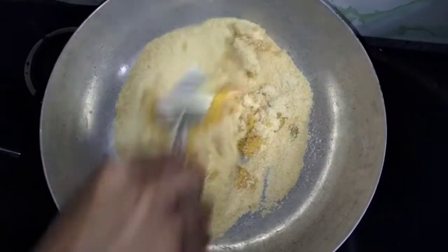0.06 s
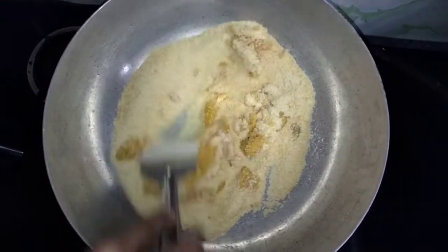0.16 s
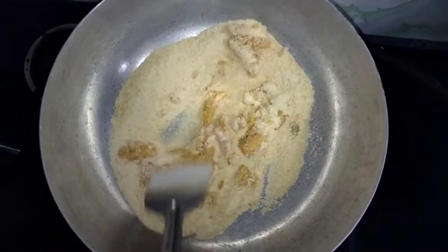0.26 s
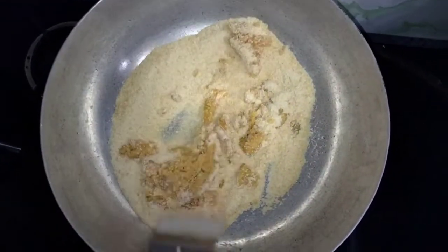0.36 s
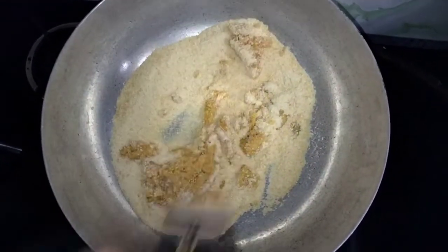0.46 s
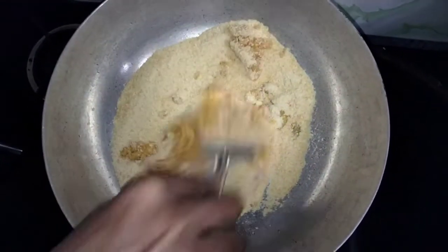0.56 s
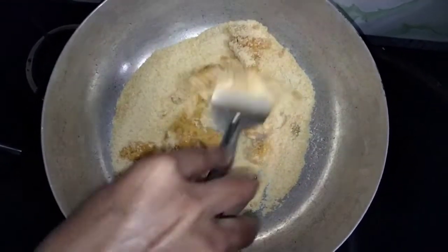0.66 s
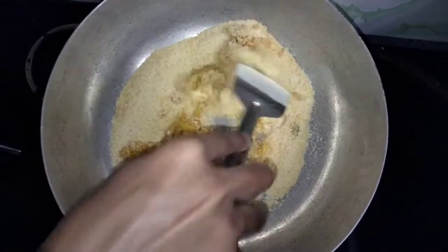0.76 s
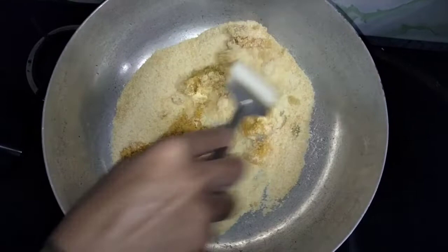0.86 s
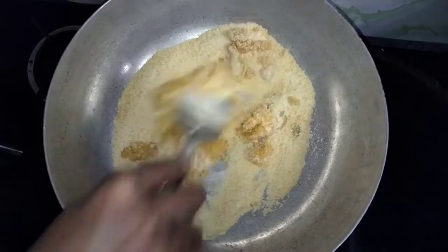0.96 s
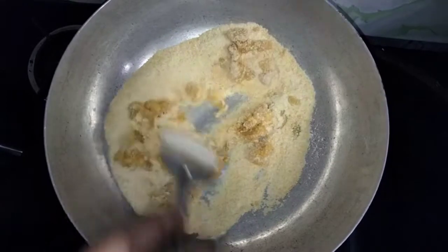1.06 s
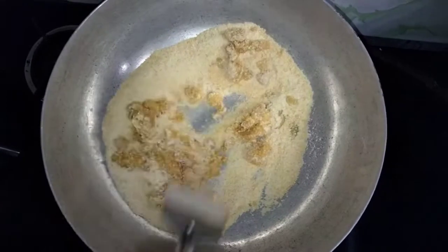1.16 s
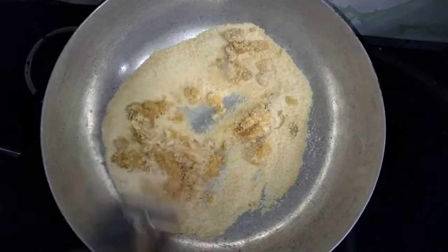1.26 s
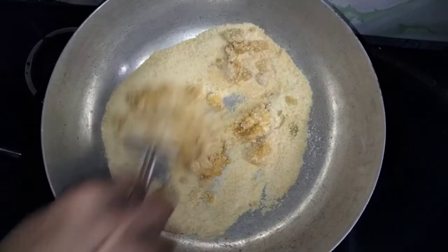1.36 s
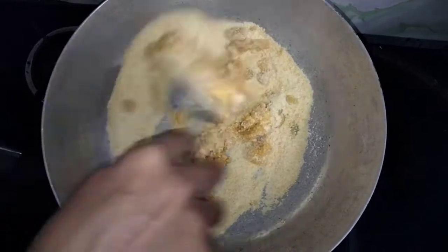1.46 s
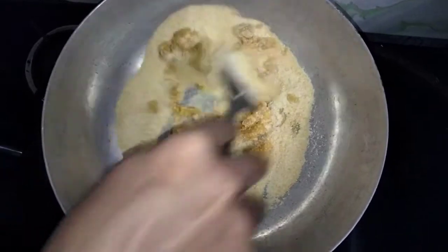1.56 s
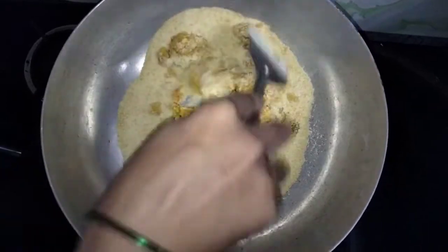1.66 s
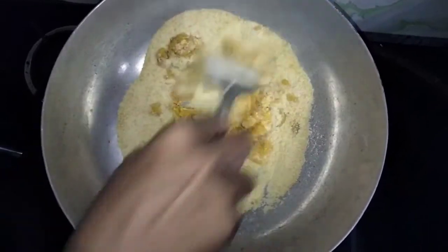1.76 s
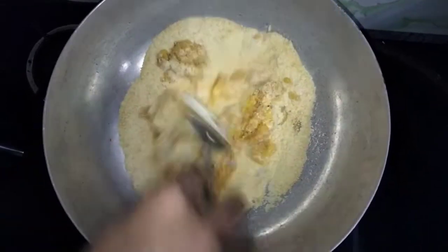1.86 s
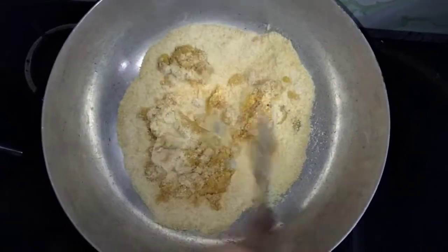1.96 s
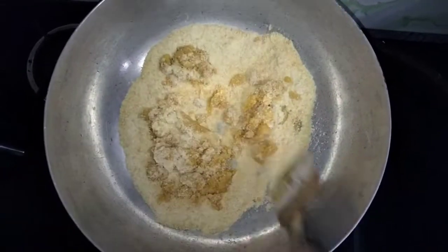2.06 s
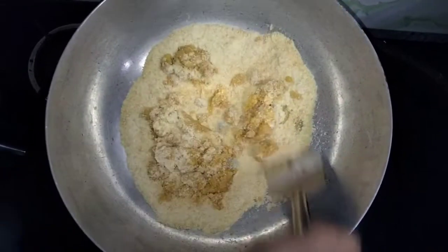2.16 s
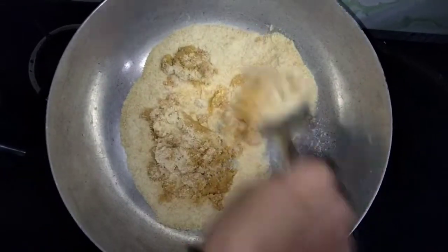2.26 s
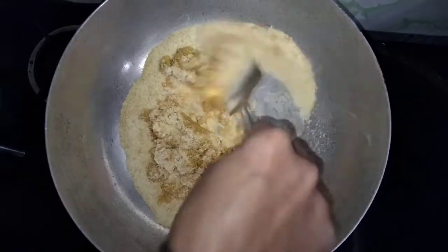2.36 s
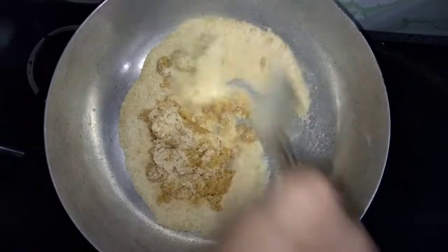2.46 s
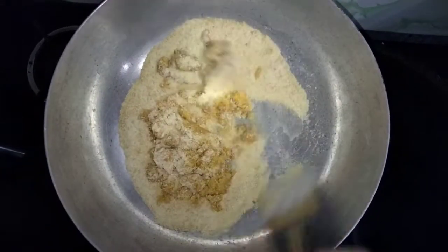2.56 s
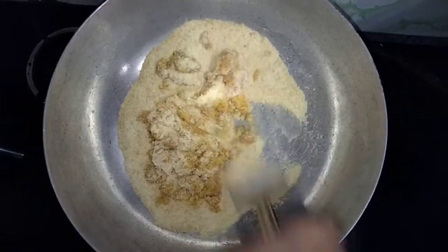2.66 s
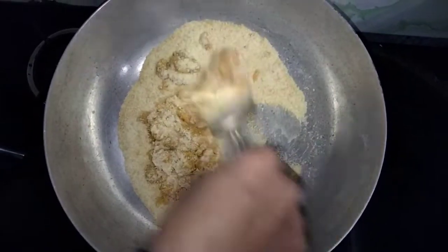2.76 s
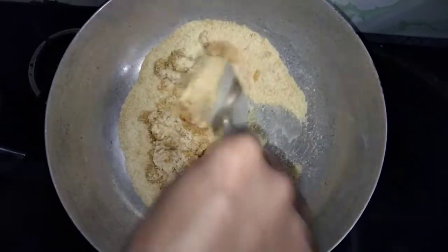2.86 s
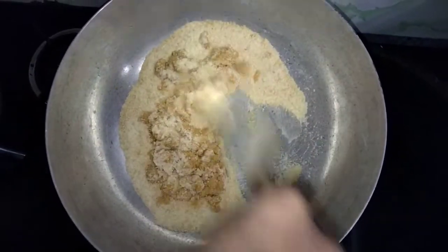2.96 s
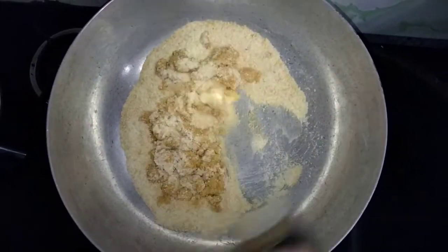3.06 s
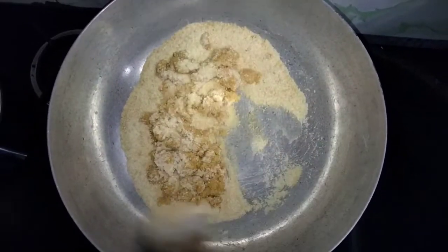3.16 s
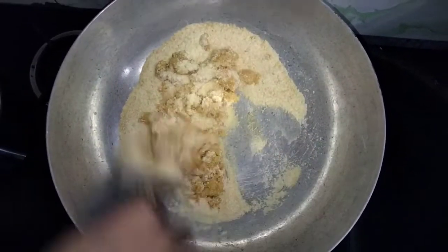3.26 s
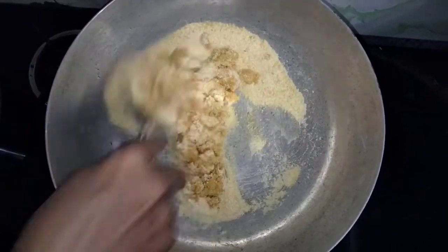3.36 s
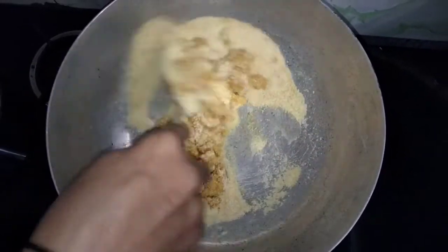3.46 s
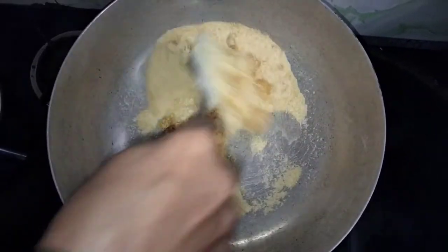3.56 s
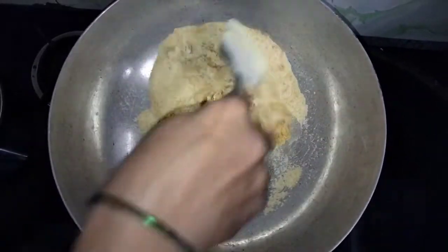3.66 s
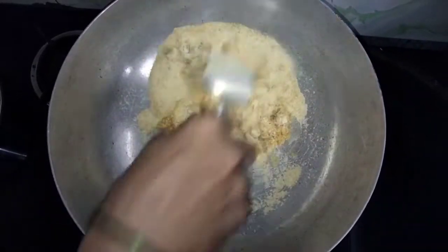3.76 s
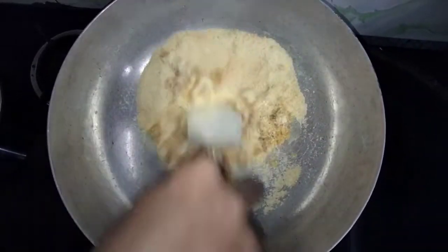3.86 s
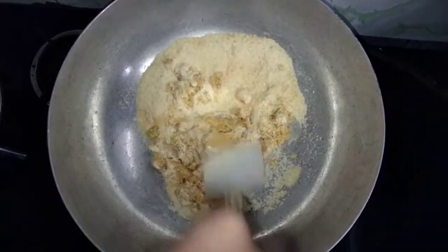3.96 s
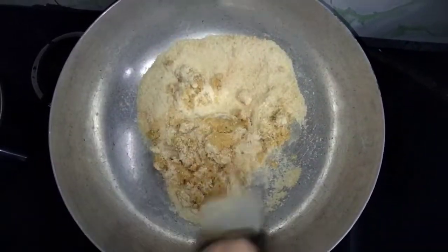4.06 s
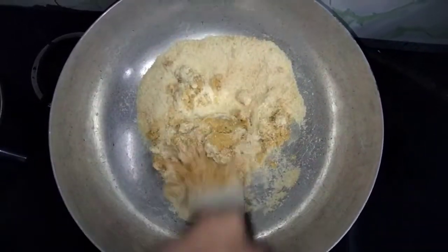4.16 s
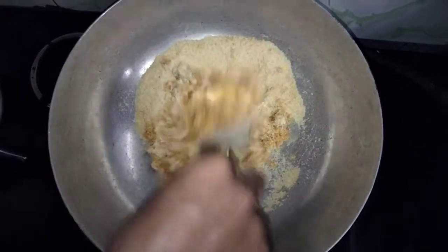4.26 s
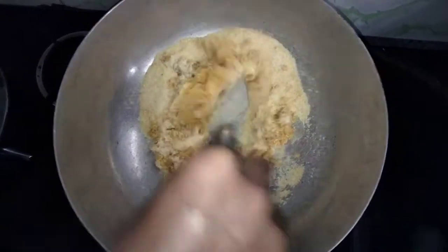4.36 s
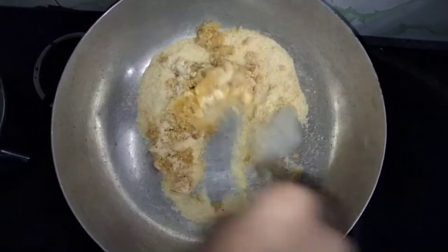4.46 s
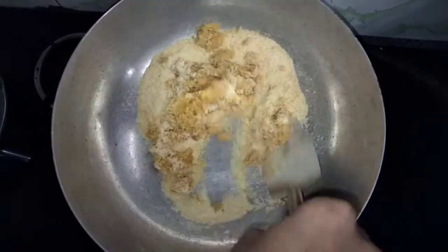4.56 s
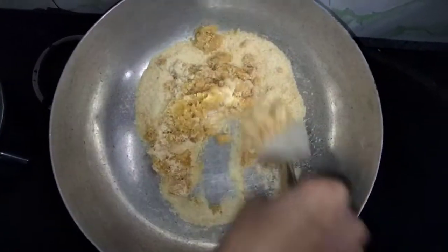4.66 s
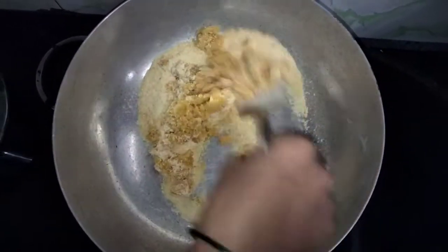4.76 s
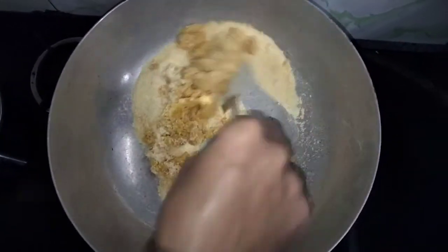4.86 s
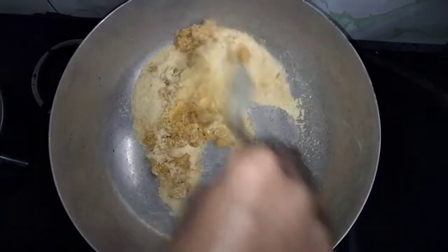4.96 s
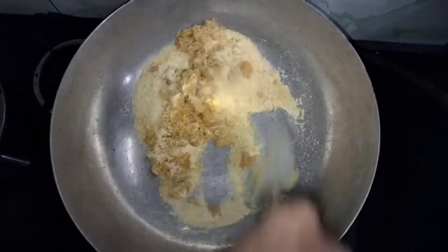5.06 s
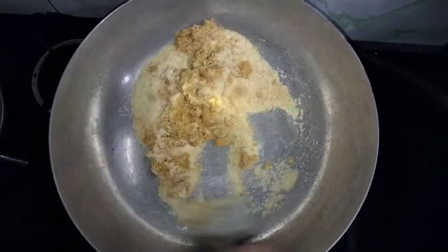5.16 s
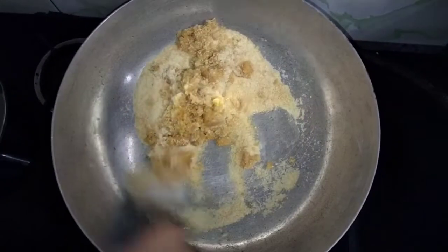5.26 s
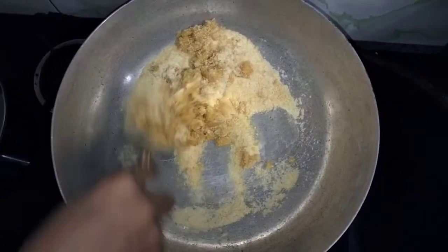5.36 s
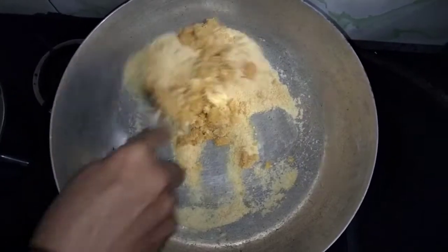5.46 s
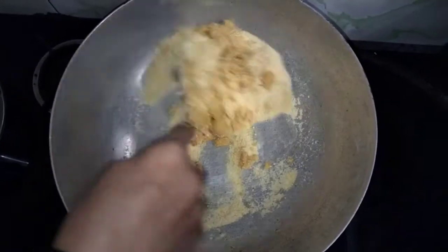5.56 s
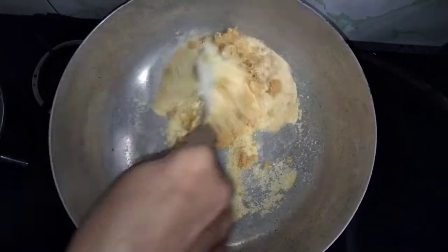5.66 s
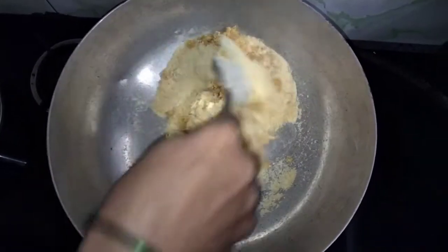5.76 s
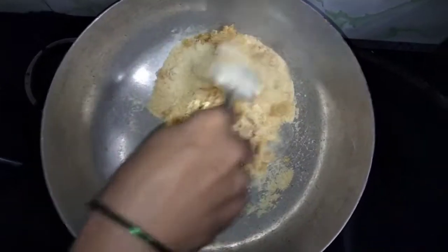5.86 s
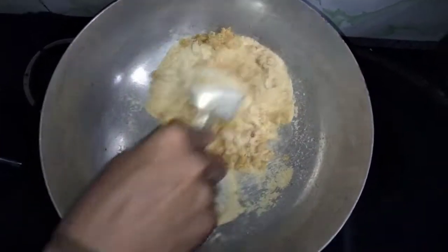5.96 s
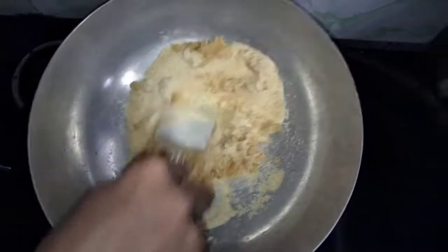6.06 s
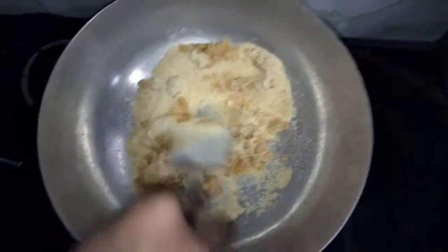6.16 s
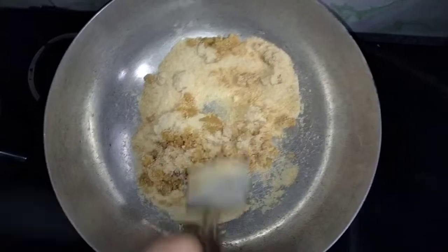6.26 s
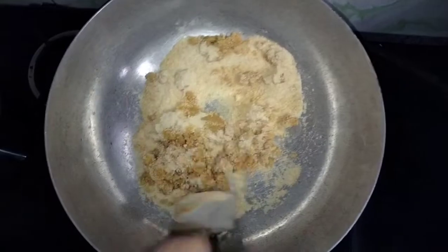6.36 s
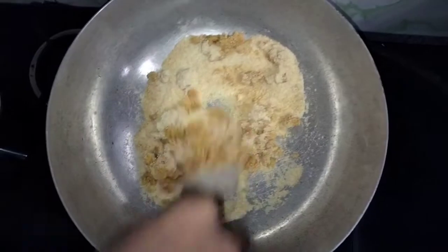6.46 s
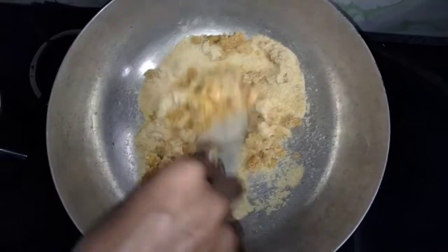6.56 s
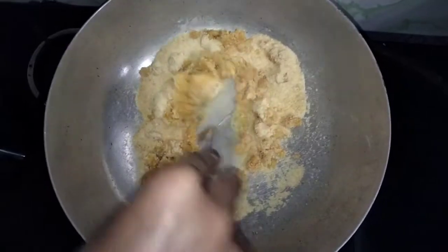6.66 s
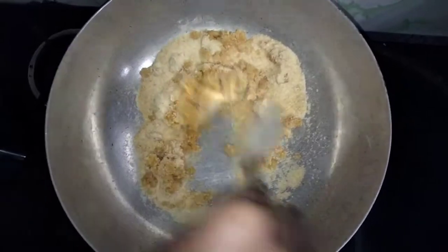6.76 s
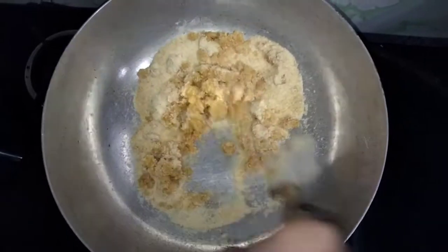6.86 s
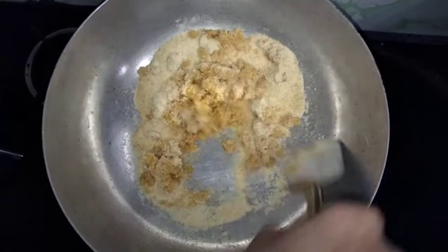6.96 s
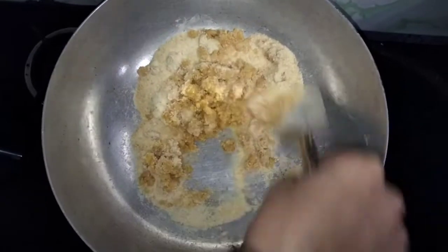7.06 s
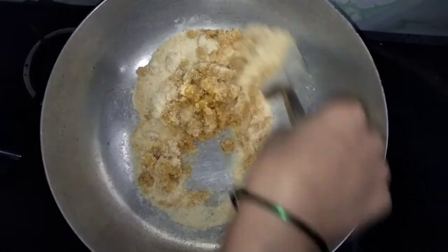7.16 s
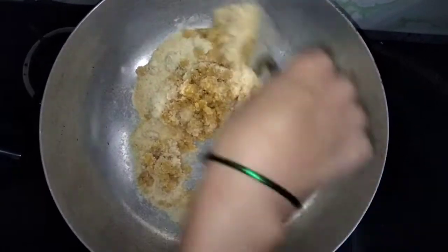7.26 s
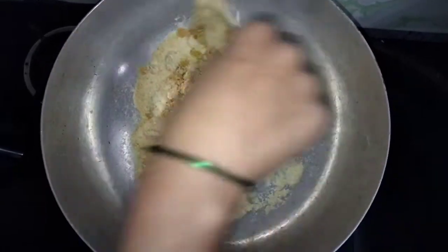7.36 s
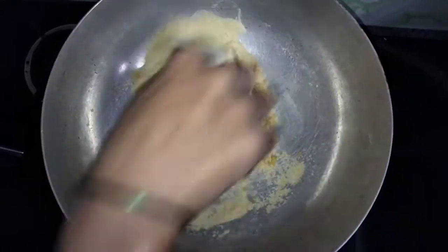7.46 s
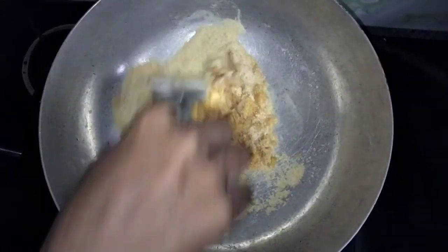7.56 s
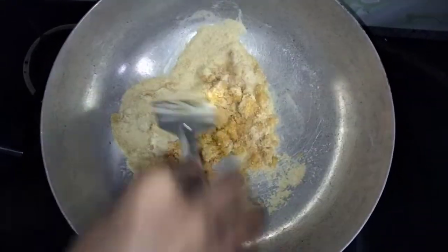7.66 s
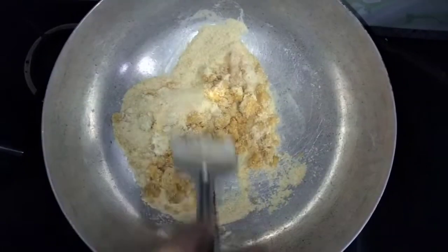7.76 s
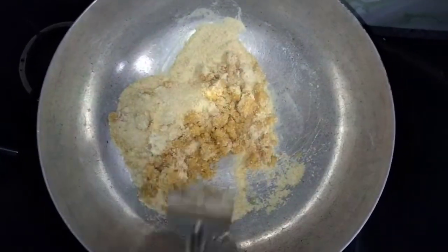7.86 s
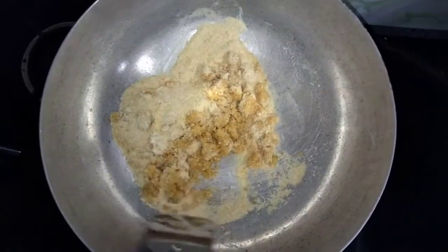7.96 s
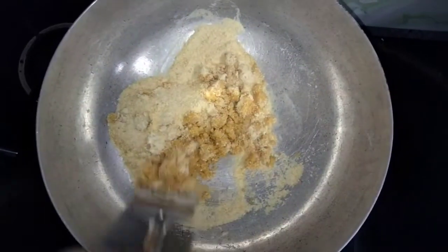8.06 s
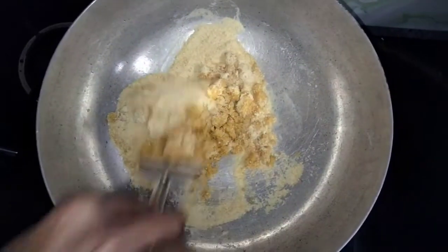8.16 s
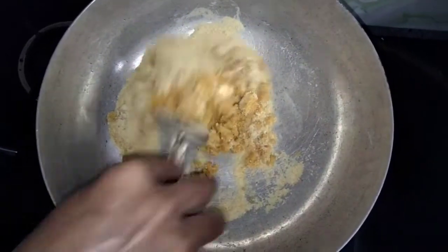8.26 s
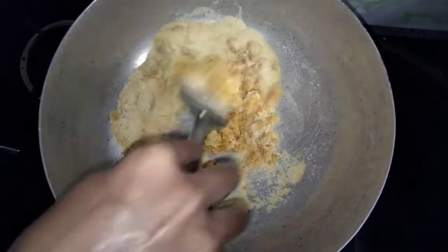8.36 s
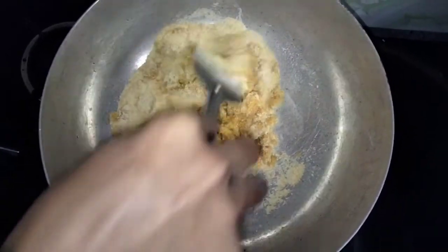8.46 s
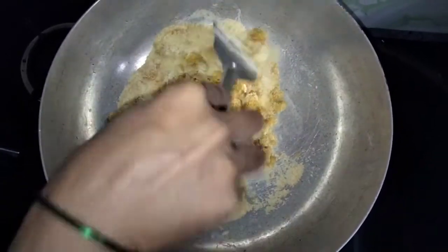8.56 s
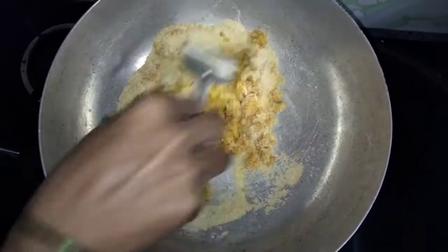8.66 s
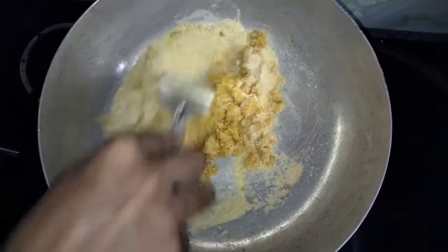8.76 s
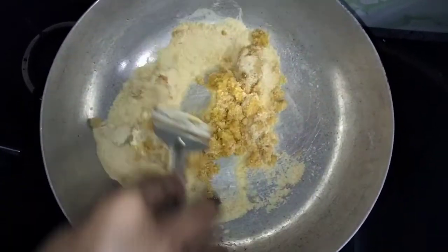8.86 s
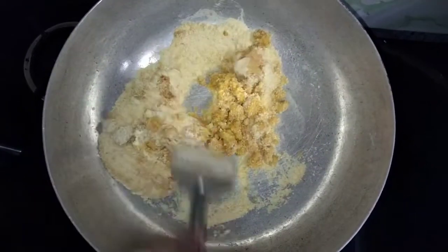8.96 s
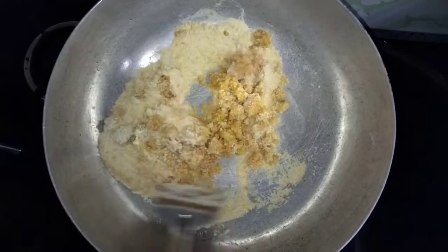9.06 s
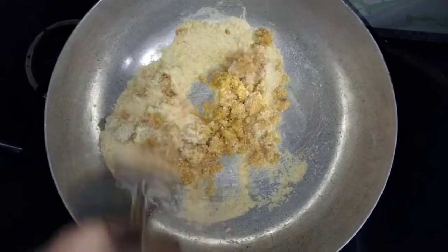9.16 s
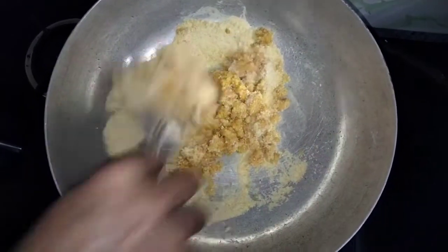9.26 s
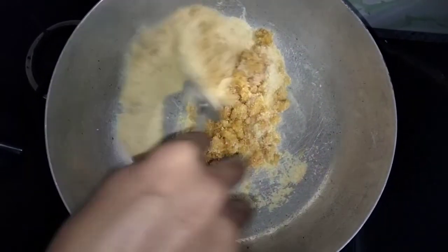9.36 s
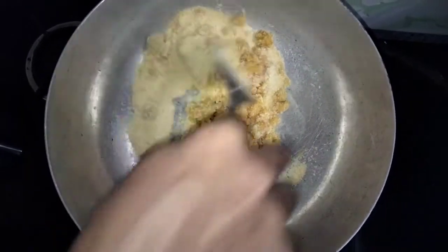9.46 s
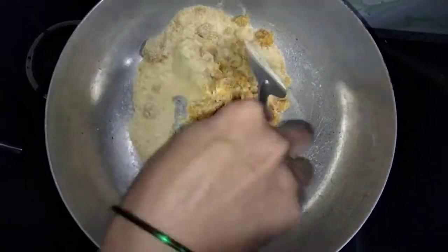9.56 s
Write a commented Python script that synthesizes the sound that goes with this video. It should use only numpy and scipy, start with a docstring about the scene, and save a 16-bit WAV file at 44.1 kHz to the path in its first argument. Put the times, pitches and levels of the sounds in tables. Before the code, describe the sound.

Close, uneven metal scraping in a pan of dry grains: bright rasping strokes, sharp clinks, soft hollow knocks and little spills of grain in a quiet kitchen.

```python
"""First a trickle of grains, then a steel spatula lands and stirs dry, sandy grains in a thin metal pan.
The place is a kitchen, heard close to a small microphone, over low rumble, a wavering hum and a late boom.
Random grit clicks make the sliding grains, the scrape of pan and blade and a moving hollow note.
Noise bursts into the same metal make the taps; soft blows and rattles ring the pan's low modes.
Each stroke lands, builds, sags, lifts off and dies away, with small spills of grains in between."""
import sys
import numpy as np
from scipy import signal
from scipy.fft import rfft, irfft, next_fast_len
from scipy.io import wavfile
from scipy.ndimage import uniform_filter1d, map_coordinates

SR = 44100
rng = np.random.default_rng(int(sys.argv[2]) if len(sys.argv) > 2 else 0)


def put_to_file(sound):
    """Save the sound as 16-bit audio at rate SR, in the file named by the first command-line argument."""
    columns = np.atleast_2d(sound).T  # one column per channel
    safe = np.clip(columns, -1, 1)
    whole_steps = np.round(safe * 32767)
    wavfile.write(sys.argv[1], SR, whole_steps.astype(np.int16))


N = 423801

# Kitchen background: [t/s, rumble level/dB, hum level/dB]
KITCHEN_LEVELS = [(0.0, -59, -75), (0.43, -59, -50.5), (0.96, -64, -58.5), (1.98, -62.5, -55.5),
                  (3.21, -64.5, -61), (3.69, -62.5, -56), (5.17, -62.5, -70.5), (6.18, -66, -72),
                  (6.37, -74, -81), (6.96, -67.5, -76), (7.31, -69.5, -98), (7.65, -65, -78),
                  (7.98, -70.5, -85), (8.91, -63.5, -80), (9.42, -64.5, -86), (9.61, -62, -97)]
# Colour of the rumble: [f/Hz, relative density/dB per Hz]
RUMBLE_SPECTRUM = [(12, -29), (25, -6.5), (60, -5.5), (170, -11), (230, -19.5), (480, -22), (2600, -30),
                   (4000, -36), (6000, -80)]
# Parts of the hum: [mean f/Hz, relative level/dB]
HUM_PARTS = [(52, -2), (102, -12)]
# Course of the short low boom: [t/s, level/dB]
BOOM_LEVELS = [(9.38, -69), (9.474, -50.5), (9.53, -51.5), (9.61, -67)]
# Resonances of the boom, each passed twice: [f/Hz, width of one pass/Hz, relative level/dB]
BOOM_RESONANCES = [(137.6, 16, 2.5), (192.4, 14, -4)]

# The pan rocks on its stand: [t/s, relative peak level/dB, share of the deep modes/0-1,
#  rattle's time to fall 60 dB/s]
PAN_KNOCKS = [(0.073, -22.5, 0.29, 0.31), (0.208, -27, 0.34, 0.32), (0.593, -30, 0.43, 0.13),
              (1.395, -32.5, 0.46, 0.16), (1.94, -25, 0.39, 0.45), (2.233, -38, 0.46, 0.51),
              (3.19, -38, 0.65, .15), (3.521, -34.5, 0.17, .11), (3.562, -23.5, 0.23, 0.36),
              (3.895, -36, 0, 0.39), (3.938, -26.5, 0.19, .27), (4.017, -34.5, 0.75, 0.28),
              (4.268, -41, 0.37, 0.12), (4.725, -37.5, 0.57, 0.13), (4.996, -28, 0.19, 0.33),
              (5.511, -28.5, 0.25, .3), (5.656, -28, 0.08, 0.31), (6.064, -46, 0, 0.36),
              (6.114, -27, .4, 0.37), (7.094, -39.5, .7, 0.13), (7.356, -36.5, 0.18, 0.29),
              (7.427, -40, 0.17, 0.3), (7.495, -44, 0.3, 0.2), (7.657, -34, 0.34, 0.34),
              (8.804, -31, .22, .15), (8.884, -33.5, 0.46, 0.29), (9.271, -32, 0.46, 0.3)]
# Modes of the loaded pan: [mean f/Hz, mean relative level/dB, t60 before a common upper limit/s]
PAN_MODES = [(332, -18, .12), (337, -13.5, 0.3), (362.8, 2.5, 0.3), (441, -8.5, 0.053), (552, -8, 0.17),
             (639.5, 2, 0.088), (689.3, 1, 0.36), (822, -9, .06), (933, -5.5, 0.029), (1427, -18, 0.068)]
# Blade taps, hard slips and falling lumps: [t/s, relative peak level/dB]
TAPS = [(0.068, -7.5), (0.208, -14), (0.595, -16), (0.6233, -7), (1.284, -24.5), (1.315, -24.5),
        (1.3922, -9.5), (1.9386, -6.5), (2.2306, -11.5), (2.3451, -6.5), (2.516, -29), (2.6, -28),
        (2.7383, -16), (3.1582, -23), (3.1887, -9), (3.558, -4.5), (3.935, -11), (4.0792, -29),
        (4.271, -29), (4.3094, -3.5), (4.5173, -30), (4.7326, -18), (4.995, -10.5), (5.029, -17),
        (5.2654, -16.5), (5.658, -10), (5.8506, -22), (6.112, -12), (6.549, -14.5), (6.574, -7.5),
        (6.804, -41.5), (6.8893, -36), (6.945, -38), (7.0969, -21), (7.356, -22), (7.428, -27),
        (7.656, -18), (7.856, -30), (8.103, -26), (8.1599, -17), (8.67, -26), (8.803, -22.5), (8.885, -20),
        (9.0815, -28), (9.2695, -7.5), (9.3168, -12)]

# Broad colour of the scrape: [f/Hz, relative density/dB per Hz]
SCRAPE_SPECTRUM = [(150, -70.5), (250, -25.5), (332, -26.5), (1520, -21), (1840, -18), (2370, -14.5),
                   (3520, -13.5), (5750, 0.5), (9690, -17), (11000, -23.5), (14300, -54.5), (22000, -120)]
# Pan and blade under friction: [mean f/Hz, width before a common lower limit/Hz, relative gain/dB]
METAL_RINGS = [(316, 60, 9.5), (699, 31, 13), (1130, 38, 2.5), (1600, 93, 4.5), (2336, 190, 9.5),
               (2920, 280, 14.5), (3826, 390, 4), (4317, 94, 8.5), (4910, 43, 5.5), (5310, 110, 1.5),
               (5715, 92, 11), (6030, 130, 9), (6505, 107, 16.5), (6920, 110, 5.5), (8310, 68, 8)]
# Colour of the sliding grains: [f/Hz, relative density/dB per Hz]
GRAIN_SPECTRUM = [(590, -48.5), (1000, -23.5), (1300, -31.5), (1740, -23), (2260, -9), (2510, -15.5),
                  (2940, -8), (4060, -13), (5540, -0.5), (6500, -0.5), (8970, -11), (12500, -15.5),
                  (15600, -17)]
# Top rings under the grains: [mean f/Hz, width before a common lower limit/Hz, relative gain/dB]
GRAIN_RINGS = [(10600, 220, -12), (11450, 560, 4.5), (12140, 150, 8.5), (12800, 360, 3.5)]
# Hollow notes of the rasp as the blade climbs the pan's wall, one list a note: [t/s, level/dB, f/Hz]
HOLLOW_NOTES = [
    [(5.35, -75, 1300), (5.41, -58, 1473), (5.45, -43.5, 1420), (5.485, -50, 1240), (5.51, -50, 940)],
    [(3.3, -61, 1320), (3.42, -49.5, 1200), (3.5, -69, 800)],
    [(7.1, -60, 1260), (7.33, -56.5, 1240)],
]

# Strokes of the blade: [landing t/s, entry into the grains before it/s, push/s, hold/s,
#  edge level on metal at full push/dB, softer at landing by/dB, drop at lift-off/dB, dying away/dB per s,
#  grains level over edge/dB, low rasp level over edge/dB]
BLADE_STROKES = [ (0.057, 0.035, 0.079, 0.12, -35.5, 10.5, 2, 155, -4.5, -8),
                 (0.598, 0.025, 0.037, .025, -18, 9.5, 9.5, 158, -15, -7.5),
                 (0.997, 0.082, 0.059, 0.066, -42.5, 12.5, 1, 199, -2, -5),
                 (1.395, 0.034, 0.12, 0.016, -23, 1, 11, 98, -15, -8),
                 (1.846, 0.048, 0.081, 0.066, -39, 6.5, 1.5, 200, -4.5, -5.5),
                 (2.233, .004, 0.13, 0.071, -30, 10, 10.5, 112, -11, -6.5),
                 (2.74, 0.0032, 0.1, .05, -24, 13.5, 9.5, 165, -14.5, -6.5),
                 (3.185, 0.0033, 0.22, 0.035, -33.5, 1.5, 1, 30, -12, -8.5),
                 (3.696, 0.025, 0.016, 0.019, -47.5, 5, 6, 60, -2.5, -1),
                 (3.85, 0.0083, 0.084, 0.026, -37.5, 11.5, 4, 148, -3.5, -2.5),
                 (4.274, 0.029, .04, 0.057, -28, -1, 7, 185.5, -10.5, -8),
                 (4.736, 0.026, 0.045, 0.13, -27, 9, 7, 108, -12, -10.5),
                 (5.261, 0.003, 0.19, 0.044, -24.5, 14, 6, 113, -13, -9),
                 (5.614, .03, 0.044, 0.065, -43, 5, 1.5, 167, -4, -15),
                 (6.026, 0.11, 0.086, 0.082, -39, 7.5, 3.5, 227, -2.5, -3.5),
                 (6.551, 0.022, 0.013, 0.093, -32.5, 1.5, 5.5, 158, -12.5, -5.5),
                 (7.096, 0.021, 0.078, .21, -34, 3.5, 2.5, 130, -8.5, -12),
                 (7.506, 0.17, 0.15, 0.072, -40.5, 11, 5.5, 247, -3, -9),
                 (8.104, .004, 0.085, 0.053, -37, 5.5, 2.5, 67, -14, -9.5),
                 (8.252, .04, 0.076, 0.029, -32, 8.5, 6, 157, -10, -4),
                 (8.786, 0.087, 0.084, 0.068, -42.5, 4.5, 2.5, 171, -3, -4),
                 (9.265, 0.014, 0.097, 0.029, -25, 21.5, 9, 118, -13.5, -13), ]
# How grains, edge, rasp and body follow the blade, one row each: [share of the softer landing,
#  extra drop in level at landing/dB, share of the drop at lift-off]
LAYER_FOLLOW = [(0.64, 3, 0.49), (1.01, 1.2, 1.46), (1.1, 7.5, 1.42), (0.65, -0.3, 1)]
# Grains spilling off the blade: [t/s, length/s, level/dB]
GRAIN_SPILLS = [(0.0, 0.058, -58.5), (0.438, .12, -79), (1.262, 0.14, -64), (1.75, 0.045, -62),
                (2.584, 0.073, -59.5), (3.05, 0.1, -60.5), (4.16, 0.067, -78), (4.515, 0.11, -58.5),
                (5.03, 0.13, -59.5), (5.85, 0.067, -51.5), (6.35, 0.023, -68.5), (6.88, 0.043, -61.5),
                (6.97, .11, -78), (7.87, 0.014, -67), (8.639, .06, -59), (9.072, 0.039, -67),
                (9.16, .08, -80)]
# Share of a spill in each layer: [grains level/dB, edge level/dB, rasp level/dB, body level/dB]
SPILL_LAYERS = (-1.7, -3, -20, -27.5)
# A faint steady floor under each layer, from start to end: [grains level/dB, edge level/dB, rasp level/dB, body
# level/dB]
FLOOR_LEVELS = (-93, -85, -95, -100)

EDGE_HZ = 15600  # top of the band
ENTRY_DB, SAG_DB_PER_S, LIFT_S = 33, 45.5, 0.017  # entry below the landing (spills: below full), sag in the hold
SPILL_RISE_S, SPILL_FALL_DB_PER_S = 0.0034, 191
BODY_DB, BODY_FOLLOWS = -41, 0.48  # the pan's low body under a rasp of 0 dB, and dB gained per dB of rasp
LIGHT_DB, HEAVY_DB = -29, -20  # lighter taps reach mostly the treble, heavier ones the whole pan


def gain_of(db):
    """Turns decibels into an amplitude factor."""
    return 10 ** (np.asarray(db) / 20)


def evened(x):
    """Scales to rms 1."""
    return x / np.sqrt(np.mean(x ** 2) + 1e-20)


def steady(x, window_s=0.077):
    """Scales to a running rms of 1: swelling rings change the colour, not the loudness."""
    window = round(window_s * SR)
    power = uniform_filter1d(uniform_filter1d(x ** 2, window), window)
    return x / np.sqrt(abs(power) + 1e-20)


def curves(rows):
    """Draws every column of a table against its times, one value a sample."""
    s, *columns = np.transpose(rows)
    return [np.interp(np.arange(N) / SR, s, c) for c in columns]


def wander(per_s):
    """Slow chance, about rms 1: straight lines between random knots."""
    knots = rng.standard_normal(2000)
    return map_coordinates(knots, [np.arange(N) / SR * per_s], order=1) * np.sqrt(3 / 2)


def causal(points, size=4096):
    """Impulse response of least delay (minimum phase) for a spectrum."""
    f, db = np.transpose(points)
    hz = abs(np.fft.fftfreq(size, 1 / SR))
    spectrum_db = np.interp(np.log(hz + 1), np.log(f + 1), db)
    log_gain = np.log(gain_of(np.maximum(spectrum_db, -100)))
    return np.fft.ifft(np.exp(np.conj(signal.hilbert(log_gain)))).real[:size // 2]


def under(x, edge_hz):
    """Keeps the part of x below an edge."""
    size = next_fast_len(N)
    gain = 1 / (1 + (np.fft.rfftfreq(size, 1 / SR) / edge_hz) ** 24)
    return irfft(rfft(x, size) * gain, size)[:N]


def resonate(x, hz, width):
    """Shifts the curve hz down to zero, smooths, and shifts back: a resonance of gain 1."""
    turn = np.exp(2j * np.pi * np.cumsum(hz * np.ones(N)) / SR)
    r = np.exp(-np.pi * width / SR)
    return 2 * (turn * signal.lfilter([1 - r], [1, -r], x * turn.conj())).real


def kitchen():
    """Low rumble is coloured noise, the hum two sines of wavering pitch, the boom resonant noise."""
    rumble_db, hum_db = curves(KITCHEN_LEVELS)
    rumble = evened(signal.oaconvolve(rng.standard_normal(N), causal(RUMBLE_SPECTRUM, size=16384))[:N])
    hum = np.zeros(N)
    for hz, db in HUM_PARTS:
        phase = 2 * np.pi * np.cumsum(hz * (1 + 0.052 * wander(4.1))) / SR
        hum += gain_of(db + 1.5 * wander(4)) * np.sin(phase)
    noise = rng.standard_normal(N)
    boom = np.zeros(N)
    for hz, width, db in BOOM_RESONANCES:
        boom += gain_of(db) * evened(resonate(resonate(noise, hz, width), hz, width))
    started = np.arange(N) / SR > BOOM_LEVELS[0][0]
    boom_gain = gain_of(curves(BOOM_LEVELS)[0]) * started
    return gain_of(rumble_db + 1.7 * wander(7)) * rumble + gain_of(hum_db) * hum + boom_gain * evened(boom)


def room(x, t60=.3):
    """Sparse reflections of random sign from tiles and counter."""
    n = SR // 2
    taps = rng.choice([-1., 1.], n) * (rng.random(n) < .05) * gain_of(-60 * np.arange(n) / SR / t60)
    taps[:150] = 0  # nothing returns in the first 3.4 ms
    return signal.fftconvolve(x, taps / np.linalg.norm(taps))[:N]


def knocks():
    """A soft blow and an uneven rattle ring the pan's damped low modes, differently each time."""
    out, t = np.zeros(N + SR), np.arange(SR // 4) / SR
    hz, db, t60 = np.transpose(PAN_MODES)[:, :, None]
    chance = rng.standard_normal((len(PAN_KNOCKS), len(PAN_MODES), 2))
    shape = (len(PAN_KNOCKS), len(t))
    rattles = rng.standard_normal(shape) * (rng.random(shape) < 600 / SR)  # about 600 blows a second
    decay_db = -60 * t / np.minimum(t60, .075)
    for (s, peak_db, deep, rattle_s), c, blows in zip(PAN_KNOCKS, chance, rattles):
        deep = np.clip(deep, 0, 1)
        share = np.where(hz < 420, deep, 1 - deep)
        tone = np.sin(2 * np.pi * hz * (1 + .035 * c[:, 1:]) * t)
        modes = share * gain_of(db + 2.5 * c[:, :1] + decay_db) * tone
        blows = 0.5 * blows * gain_of(-60 * t / max(rattle_s, .01))
        blows[0] = 1  # the first blow
        knock = signal.fftconvolve(modes.sum(0), blows)
        out[round(s * SR):][:2 * len(t) - 1] += gain_of(peak_db - 13.0) * knock
    # a thin pan radiates no deep bass
    return signal.sosfilt(signal.butter(4, 265, "high", fs=SR, output="sos"), out[:N])


def rung(broad, rings, swell_db, slide):
    """Adds rings that swell, fade and slide as the blade changes place and pressure; low ones swell less."""
    out = .7 * broad
    for hz, width, db in rings:
        gain = gain_of(db + swell_db * min(hz / 2200, 1) * np.tanh(wander(11)))
        out = out + gain * resonate(broad, hz * (1 + slide * wander(10)), max(width, 65))
    return out


def metal(drive, swell_db):
    """Gives a drive the broad colour and the rings of pan and blade."""
    colour = causal(SCRAPE_SPECTRUM)
    broad = signal.oaconvolve(drive, colour)[:N] / np.linalg.norm(colour)
    return rung(broad, METAL_RINGS, swell_db, .02)


def ticks():
    """Each tap is a burst of a few milliseconds into the same metal, sharpest at its start."""
    n = 800
    drive, t = np.zeros(N + n), np.arange(n) / SR
    bursts = rng.standard_normal((len(TAPS), n)) * gain_of(-60 * t / 0.013)
    bursts[:, 0] = 1.5
    for (s, db), burst in zip(TAPS, bursts):
        heavy = np.clip((db - LIGHT_DB) / (HEAVY_DB - LIGHT_DB), 0, 1)
        treble = 2.0 * np.diff(burst, 2, prepend=[0, 0])
        drive[round(s * SR):][:n] += gain_of(db) * (heavy * burst + (1 - heavy) * treble)
    return gain_of(-20.5) * metal(drive[:N], 2.2)


def grit(per_s, spread_db, clump_db, clumps_per_s):
    """Random clicks of widely spread size that come in small clumps."""
    size = gain_of(spread_db * np.minimum(rng.exponential(1, N), 3.5)) * rng.choice([-1., 1.], N)
    clicks = size * (rng.random(N) < per_s / SR)
    return evened(clicks * gain_of(clump_db * np.tanh(wander(clumps_per_s))))


def hollow():
    """Grit heard through a wide resonance that slides as the blade climbs the pan's wall."""
    out = np.zeros(N)
    for rows in HOLLOW_NOTES:
        db, hz = curves(rows)
        note = evened(resonate(resonate(grit(5000, 1.7, 2.1, 74), hz, 440), hz, 410))
        start, end = rows[0][0], rows[-1][0]
        fade = np.interp(np.arange(N) / SR, [start - .01, start, end, end + 0.011], [0, 1, 1, 0])
        out += gain_of(db) * note * fade
    return out


def levels():
    """Sums the power of strokes and spills into levels in dB of grains, edge, rasp and body."""
    t = np.arange(0, N, 40) / SR  # one value per 40 samples is enough
    power = np.array([gain_of(2 * db) + 0 * t for db in FLOOR_LEVELS])
    for s, entry, push, hold, peak_db, soft_db, drop_db, fall, grains_db, rasp_db in BLADE_STROKES:
        times = s + np.cumsum([-entry, entry, push, hold, LIFT_S, 1])
        body_db = BODY_DB + BODY_FOLLOWS * (peak_db + rasp_db) - peak_db
        over_edge_db = (grains_db, 0, rasp_db, body_db)
        for layer, over_db, (soft, under_db, lift) in zip(power, over_edge_db, LAYER_FOLLOW):
            landed, sagged = soft * soft_db + under_db, SAG_DB_PER_S * hold
            lifted = sagged + lift * drop_db
            # dB below full push
            down = np.interp(t, times, [landed + ENTRY_DB, landed, 0, sagged, lifted, lifted + fall], left=200)
            layer += gain_of(2 * (peak_db + over_db - down))
    for s, length, db in GRAIN_SPILLS:
        times = s + np.cumsum([-SPILL_RISE_S, SPILL_RISE_S, length, 1])
        down = np.interp(t, times, [ENTRY_DB, 0, 0, SPILL_FALL_DB_PER_S], left=200)
        power += gain_of(2 * (db + np.array(SPILL_LAYERS)[:, None] - down))
    return [np.interp(np.arange(N) / SR, t, 10 * np.log10(layer)) for layer in power]


def grains(level_db):
    """Dense fine hiss of sliding grains, with a few larger ones dropping singly."""
    slide = grit(14000, 2.5, 2.5, 90) + gain_of(-12) * grit(45, 3.0, 2.5, 12)
    hiss = rung(signal.oaconvolve(slide, causal(GRAIN_SPECTRUM))[:N], GRAIN_RINGS, 3.6, 0.0097)
    top_fizz = hiss - under(hiss, 8500)
    return gain_of(level_db) * hiss / np.std(top_fizz)  # the level is that of the top fizz


def blade(edge_db, rasp_db, body_db):
    """Coarser grit crushed under the edge rings the metal; rasp and low body have levels of their own."""
    sound = metal(grit(5500, 2.8, 5.0, 80), 11.0)
    low, body = under(sound, 4200), under(sound, 1300)
    edge = gain_of(edge_db) * steady(sound - low)
    rasp = gain_of(rasp_db) * steady(low - body)
    return edge + rasp + gain_of(body_db) * steady(body)


def scene():
    """Taps and knocks are heard with the room; the stroke levels carry their own dying away."""
    background = kitchen()
    thuds = knocks()
    taps = ticks()
    reflected = room(gain_of(-8) * taps + gain_of(-13) * thuds)
    grains_db, *blade_db = levels()
    strokes = hollow() + grains(grains_db) + blade(*blade_db)
    return (background + reflected + thuds + taps + strokes)[None]


def record(dry):
    """Limits the band with a steep linear-phase low-pass."""
    low_pass = signal.firwin(511, EDGE_HZ, window=("kaiser", 9), fs=SR)
    return signal.oaconvolve(dry, low_pass[None], "same")


dry = scene()
out = record(dry)
put_to_file(out)
```